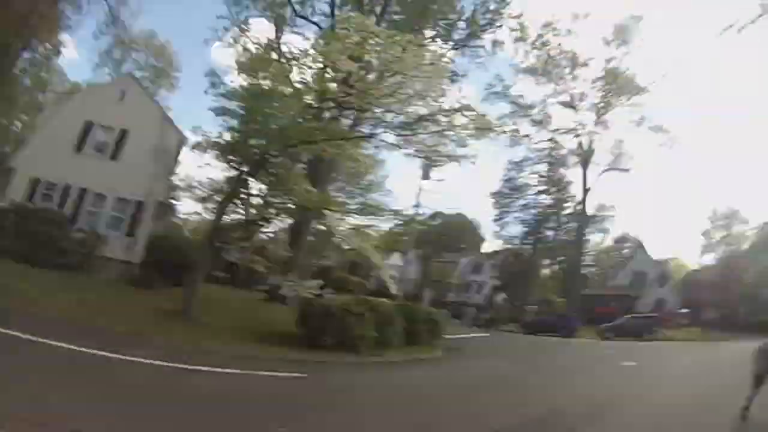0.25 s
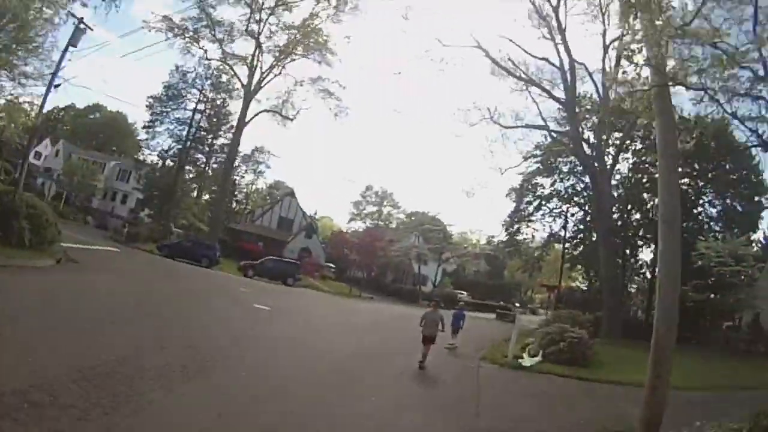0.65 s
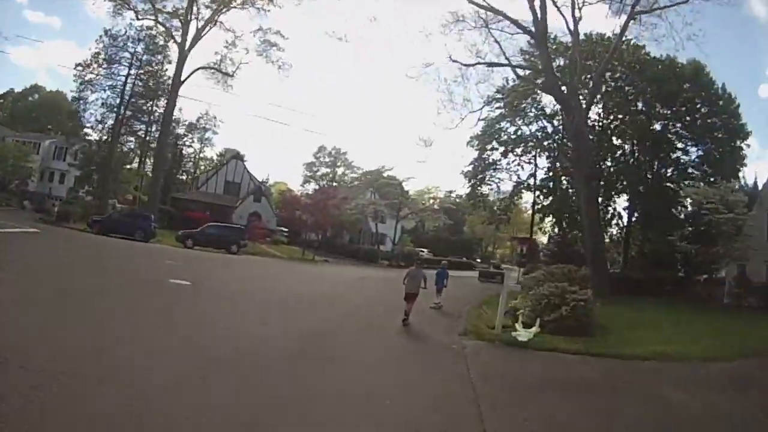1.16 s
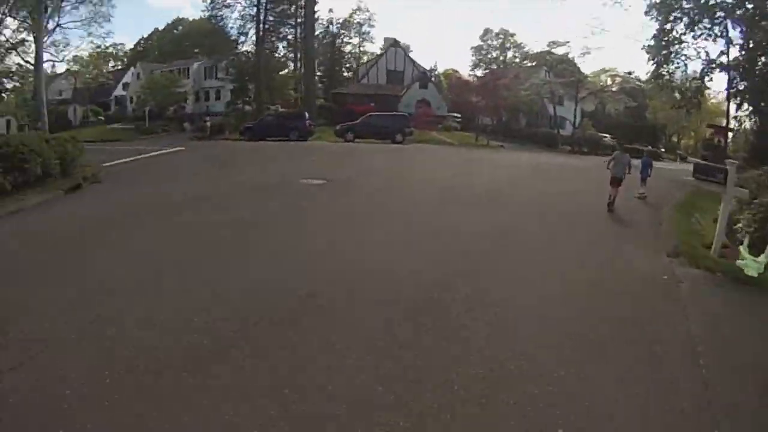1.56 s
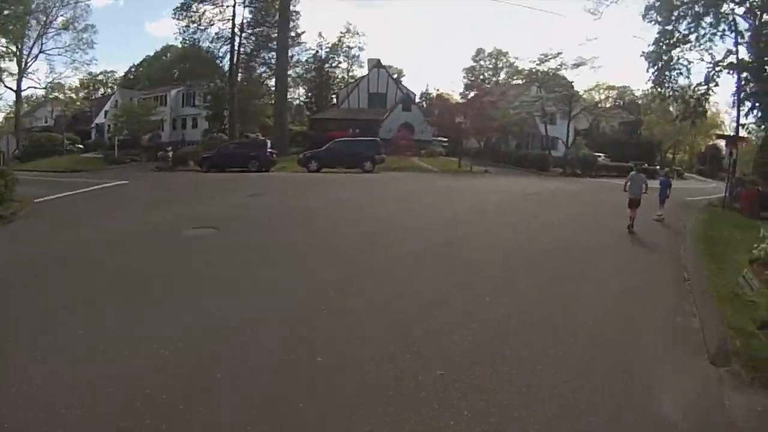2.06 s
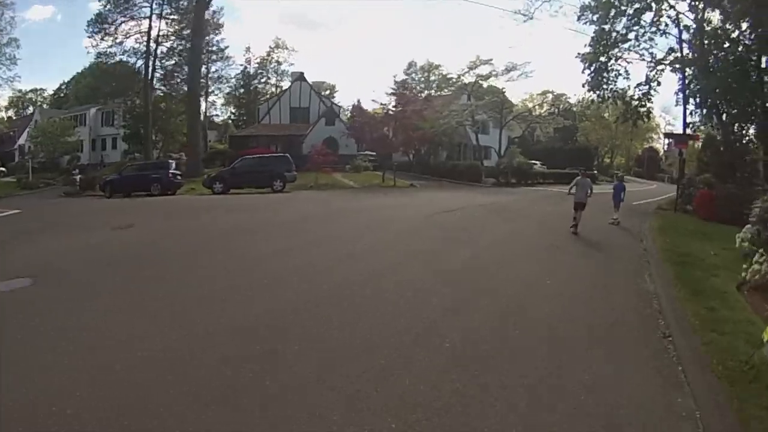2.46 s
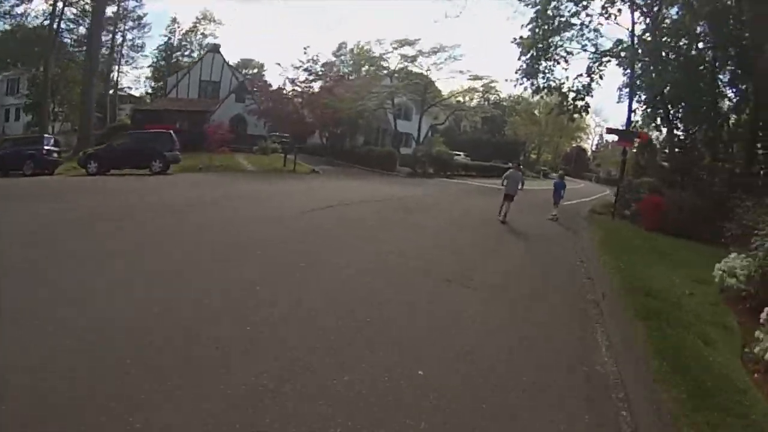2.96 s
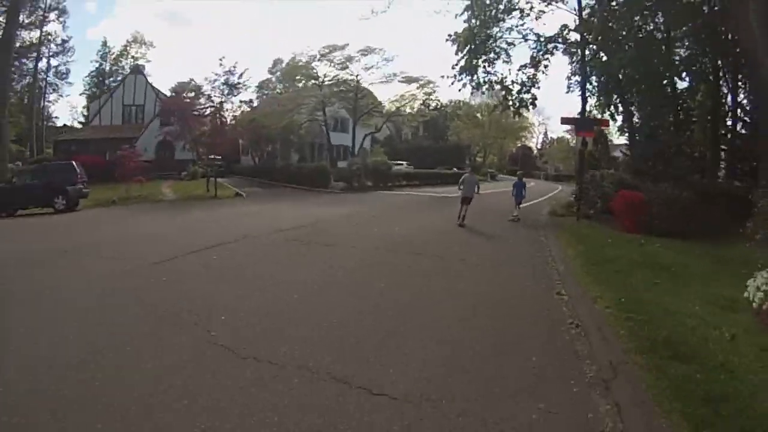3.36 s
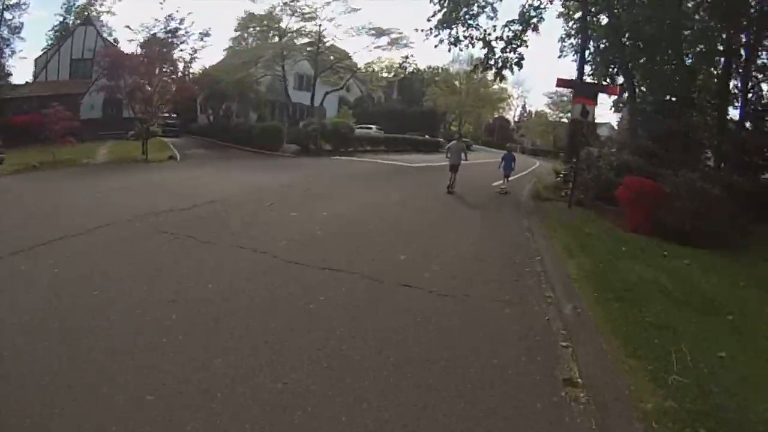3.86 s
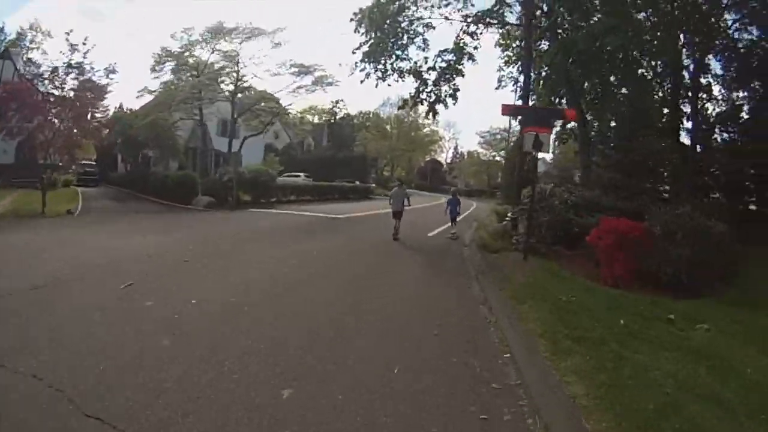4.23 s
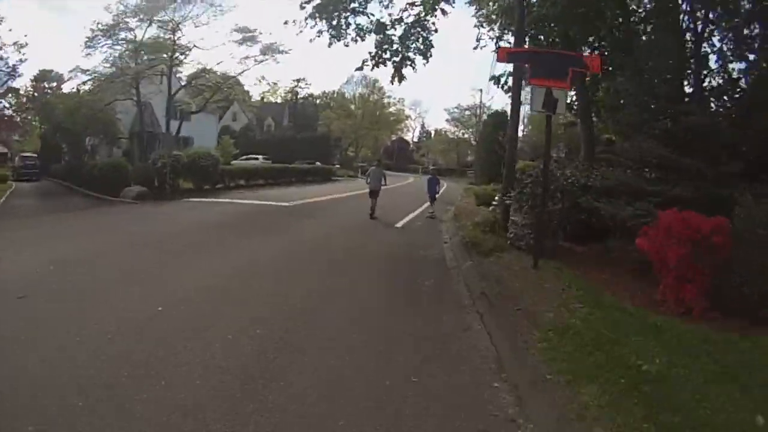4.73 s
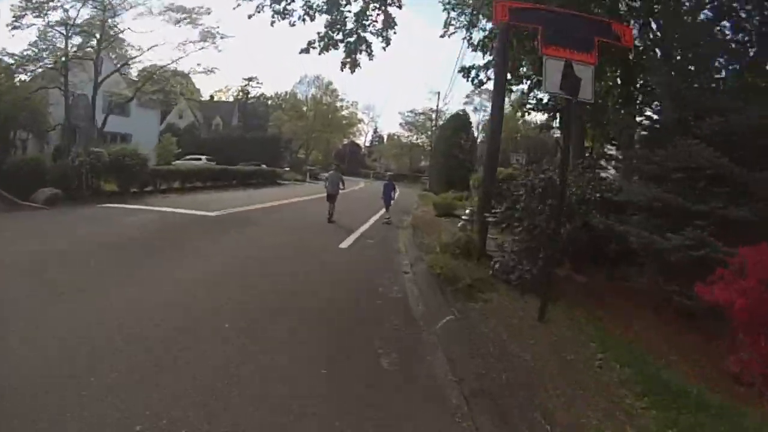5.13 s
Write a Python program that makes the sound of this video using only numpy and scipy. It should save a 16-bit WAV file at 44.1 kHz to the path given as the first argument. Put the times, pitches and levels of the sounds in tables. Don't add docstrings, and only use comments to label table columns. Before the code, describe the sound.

Heard from a sealed camera on a hand-held pole outdoors, a longboard rolls down asphalt with a soft hum and dull hiss. The first second is busy with bass wind thumps, plastic rubbing and clicks, topped by a sharp loud crack near half a second. Then it calms, with scattered snaps, finger slides, a longer drag past three seconds, and a low thump at the end.

```python
import sys
import numpy as np
from scipy import signal
from scipy.fft import rfft, irfft, next_fast_len
from scipy.io import wavfile
from scipy.ndimage import uniform_filter1d, map_coordinates

SR = 44100
rng = np.random.default_rng(int(sys.argv[2]) if len(sys.argv) > 2 else 0)


def attenuation_scalar(level_db):
    decades = np.asarray(level_db, float) / 20
    return 10 ** decades


def generate_wav(signal):
    frames = np.transpose(np.atleast_2d(signal))
    scaled = np.clip(frames, -1, 1) * 32767
    pcm = np.round(scaled).astype(np.int16)
    wavfile.write(sys.argv[1], SR, pcm)


N = 237630

# time in seconds, pitch in Hz, level in dB.
SQUEAK = [(1.52, 476, -86), (1.55, 480, -62), (1.6, 485, -60), (1.68, 491, -67)]
# multiple, level in dB.
SQUEAK_ORDERS = [(3, 1.5), (4, -9), (5, -4.5)]

# time in seconds, tyre hiss in dB.
ASPHALT = [(0.0, -51), (0.27, -53), (0.73, -54.5), (0.88, -55.5), (2.1, -57), (3.29, -55), (3.51, -56.5),
           (5.1, -56.5), (5.39, -55.5)]
# centre in Hz, width in Hz, level in dB.
DECK = [(305, 59, -10), (408.6, 10.8, 2), (502, 32.6, 4), (571, 21.6, 2), (927, 17, -12), (1440, 160, -13)]
# frequency in Hz, level in dB per Hz.
HISS_COLOUR = [(53, -50), (90, -2.5), (236, -11.5), (523, -2.5), (803, -17), (3700, -21.5), (4100, -27.5),
               (15200, -42)]
# centre in Hz, width in Hz, level in dB over the hiss.
WHEEL_CORES = [(953, 110, 2), (1440, 140, 5), (2380, 260, 0), (3580, 240, 4.5)]
HUM_DB, HUM_FOLLOWS = -56.5, -0.14
HISS_DB = 2.5

# time in seconds, level in dB.
AIRSTREAM = [(0, -46), (.8, -54), (3, -57), (3.6, -59), (4.3, -60), (5.39, -57)]
# frequency in Hz, level in dB per Hz.
WIND_COLOUR = [(8, -44), (22, -7.5), (40, 0), (58, -5.5), (120, -37), (300, -30.5), (800, -79)]
# top in seconds, half length in seconds, level in dB.
GUSTS = [(.08, 0.078, -27), (.215, 0.079, -19.5), (.375, 0.075, -34), (.66, .13, -33), (1.09, 0.13, -48),
         (1.25, 0.054, -42), (1.37, 0.068, -40), (1.6, 0.16, -49), (1.73, 0.1, -46), (1.91, 0.096, -44.5),
         (2.15, 0.08, -40.5), (2.32, 0.077, -33.5), (2.41, .08, -40), (2.6, .13, -34.5),
         (3.27, 0.45, -47.5), (3.75, 0.16, -51), (3.99, 0.14, -40), (4.35, 0.19, -50), (4.6, 0.059, -39),
         (4.79, 0.083, -44.5)]
# centre in Hz, width in Hz, level in dB.
POLE = [(76, 8, -11.5), (171, 600, -37)]
# top in seconds, half length in seconds, level in dB.
SWINGS = [(0, 0.033, -22), (.125, 0.04, -48), (.215, 0.065, -29), (.375, 0.024, -22.5), (.44, 0.03, -31),
          (.6, 0.47, -45.5), (.715, 0.022, -45), (1.16, 0.1, -36), (1.37, 0.03, -41), (1.73, 0.042, -58),
          (1.91, .06, -45), (2.27, 0.11, -43), (2.32, 0.046, -32.5), (2.6, 0.16, -37), (3.26, 0.14, -33.5),
          (3.75, 0.056, -41.5), (3.96, 0.05, -37), (4.39, 0.055, -54), (5, 0.33, -51.5), (5.3, 0.32, -48)]
# time in seconds, level in dB, pitch in Hz, 60 dB decay in seconds.
JOLTS = [
    (0.126, -23, 63, 0.22),
    (0.374, -32, 68, 0.086),
    (1.148, -26.5, 71.6, 0.26),
    (1.895, -35, 76, 0.15),
    (2.319, -40, 64.5, 0.11),
    (3.957, -34, 76, 0.11),
    (5.319, -20, 78.3, 0.21),
]
TREMOR_DB, TREMOR_GROWS = -64, 3.6
FADE_DB, ROUND = 23, 1.12

# centre in Hz, width in Hz, level in dB.
HOUSING = [(1680, 190, 2), (2350, 220, 1), (2845, 240, -4), (3320, 240, -1), (4100, 320, -5.5),
           (4530, 250, -8)]
# centre in Hz, width in Hz, level in dB.
CAVITY = [(767, 84, -8), (1005, 99, -0.5), (1440, 180, -1.5)]
# centre in Hz, width in Hz, level in dB.
THIN_WALLS = [(5500, 400, 0), (6300, 450, -2.5), (7450, 300, -3), (8400, 700, -13)]
# centre in Hz, width in Hz, level in dB.
MOUNT = [(185, 240, 2), (356, 117, -5), (717, 212, 2.5)]
# frequency in Hz, level in dB per Hz.
SKIN = [(5000, -40), (8000, 2), (10000, -1.5), (12500, -6), (15300, -12.5)]

# top in seconds, rise in seconds, fall in seconds,
# level in dB, depth (share of the mount) in dB.
TURNS = [(.205, 0.066, 0.063, -44.5, 2), (0.376, 0.025, 0.047, -38, 3), (.44, 0.039, 0.041, -55, 3),
         (.615, 0.064, 0.066, -42.5, -1), (0.706, .08, 0.053, -39, -1.5), (1.725, 0.032, 0.072, -48.5, 1.5),
         (1.85, 0.05, 0.054, -56, -1)]
# top, rise and fall in seconds, level in dB, depth in dB.
SCUFFS = [
    (.01, 0.044, 0.096, -50.5, 1),
    (0.08, 0.024, 0.023, -39.5, -6),
    (0.254, 0.037, 0.069, -38, -3.5),
    (5.385, 0.034, .04, -51.5, -4),
]
# top, rise and fall in seconds, level in dB, depth in dB.
SLIDES = [(.9, 0.18, 0.2, -57.5, -11), (1.235, 0.028, 0.052, -54, -6), (2.576, 0.065, 0.068, -34.5, -14.5),
          (2.642, 0.013, 0.045, -45, -7), (2.89, 0.17, .08, -54.5, -8), (2.95, 0.056, 0.034, -56.5, -10),
          (3.975, 0.029, 0.077, -42.5, -10), (5.2, .08, 0.17, -62, -15)]
# top, rise and fall in seconds, level in dB, depth in dB.
DRAG = [
    (3.17, 0.032, 0.061, -54, -4.5),
    (3.257, 0.055, 0.12, -33, -21.5),
    (3.39, 0.068, 0.075, -51, -30),
]
# top in seconds, fall in seconds, level in dB, depth in dB.
SETTLES = [(0.13, 0.01, -44, 15), (.418, 0.016, -58, -4), (0.479, 0.049, -39, -6), (1.136, 0.014, -46.5, 3),
           (1.149, 0.078, -41, 2), (1.356, 0.038, -52.5, 10), (1.385, 0.07, -49.5, 4),
           (1.597, 0.064, -56.5, 1), (1.906, .015, -53, -23), (2.322, 0.062, -51.5, 3.5),
           (4.585, 0.042, -46.5, 0.5), (4.607, .02, -52, -7), (4.77, 0.013, -40, -26),
           (4.793, 0.042, -51, -6.5), (.328, 0.026, -48.5, 2), (2.554, 0.029, -44, -1),
           (5.322, 0.057, -43, 0.5), (3.219, 0.019, -50, 3), (3.425, .03, -48, -12)]
# air inside in dB, thin walls in dB, skin in dB,
# squareness of the rise, squareness of the fall.
GRIPS = [
    (-3.5, -16.5, -26, 2.25, 2.1),
    (-5.5, -10.5, -16, 2.5, 1.75),
    (-5, -14, -23, 2.18, 1.83),
    (2, -15.5, -18.5, 2.6, 2.1),
    (-7.5, -15.5, -20, 1.37, 0.85),
]
STROKE_DB, SETTLE_RISE_S = 26.5, 0.013
HOLLOW_SHARE = 0.36

# time in seconds, peak in dB, pitch in Hz, bright crack in dB.
CRACKS = [
    (.462, 3, 2794, -24.5),
    (2.306, -11, 2310, -19),
]
# time in seconds, peak in dB, pitch in Hz, bright crack in dB.
SNAPS = [(.038, -21, 2670, -15), (1.142, -16, 1580, -19.5), (1.376, -21.5, 1480, -33),
         (2.638, -32, 1680, -5), (3.41, -32, 3560, -17), (3.415, -34.5, 3210, -8), (3.75, -31, 2200, -20),
         (3.953, -24, 1640, -16), (4.769, -22.5, 2260, -14), (4.788, -36.5, 3470, -21),
         (5.316, -26, 1700, -27)]
# time in seconds, peak in dB, pitch in Hz, bright crack in dB.
RATTLES = [(.043, -28, 1540, -14), (0.236, -23.5, 1435, -5), (0.362, -32.5, 1460, -29),
           (.409, -26, 1920, -10), (.453, -30.5, 1540, -2), (1.589, -42.5, 2410, -6),
           (1.903, -51, 2620, -5), (2.69, -46.5, 2950, -4), (4.579, -49.5, 3660, 8),
           (4.605, -34, 1440, -33)]
# time in seconds, peak in dB, pitch in Hz, bright crack in dB.
BUMPS = [(.121, -23.5, 1320, -3), (0.14, -40, 1410, -17), (.159, -33.5, 1710, -14), (0.325, -39, 1660, -20),
         (1.354, -33.5, 2300, -32), (1.715, -33.5, 1500, -16), (1.837, -37.5, 1600, -21),
         (2.306, -20, 996, -25), (1.143, -25, 970, -27), (4.291, -45, 1440, -17)]
# rattle in dB, low thud in dB.
CLICK_KINDS = [
    (-11.5, -27.5),
    (-6, -25),
    (5, -23),
    (-5, -3.5),
]


def unit(x):
    return x / np.sqrt(np.mean(x ** 2) + 1e-20)


def curves(rows):
    s, *cols = np.transpose(rows)
    return [np.interp(np.arange(N) / SR, s, c) for c in cols]


def wobble(rate):
    points = rng.standard_normal(int(N * rate / SR) + 4)
    return map_coordinates(points, [np.arange(N) * rate / SR])


def filtered(x, response):
    m = next_fast_len(len(x) + 4096)
    return irfft(rfft(x, m) * response(np.fft.rfftfreq(m, 1 / SR)), m)[:len(x)]


def colour(points):
    f, v = np.transpose(points)
    return lambda hz: attenuation_scalar(np.interp(np.log(hz + 1), np.log(f + 1), v))


def modes(rows):
    def response(f):
        total = 0
        for k, (centre, width, db) in enumerate(rows):
            total = total + (-1) ** k * attenuation_scalar(db) * 1j * f * width / (centre * centre - f * f + 1j * f * width)
        return total
    return response


def grit(rate, spread_db, noise):
    hit = rng.random(N) < rate / SR
    size = np.minimum(rng.exponential(size=N), 5.5)
    sign = np.sign(rng.standard_normal(N))
    impacts = unit(hit * attenuation_scalar(spread_db * size) * sign)
    return unit(impacts + noise * rng.standard_normal(N))


def even(x, seconds):
    power = abs(uniform_filter1d(unit(x) ** 2, size=int(seconds * SR)))
    return unit(x / np.sqrt(power + 0.84))


def swell(s, rise, fall, db, loss_db, sudden, lasting):
    t = np.arange(N) / SR - s
    flank = abs(t / np.where(t < 0, rise, fall)) ** np.where(t < 0, sudden, lasting)
    return attenuation_scalar(db - np.minimum(loss_db * flank, 120))


def swells(rows):
    return sum(swell(s, half, half, db, FADE_DB, ROUND, ROUND) for s, half, db in rows)


def bearing():
    hz, db = curves(SQUEAK)
    angle = 2 * np.pi * np.cumsum(hz * (1 + 0.0046 * wobble(58.3))) / SR
    squeak = attenuation_scalar(db) * sum(attenuation_scalar(level + 3 * wobble(24)) * np.sin(k * angle) for k, level in SQUEAK_ORDERS)
    half_s = SQUEAK[-1][0] - SQUEAK[1][0]
    sounding = abs(np.arange(N) / SR - SQUEAK[2][0]) < half_s
    phase = np.cumsum(11 * (1 + 0.15 * wobble(2.5))) / SR % 1
    tick_noise = unit(filtered(rng.standard_normal(N), modes([(9300, 810, 0)])))
    ticks = attenuation_scalar(-79.5 - 60 * phase / 0.56) * tick_noise
    return squeak * sounding + 3 * ticks


def wheels():
    road_db, = curves(ASPHALT)
    hum_db = HUM_DB + HUM_FOLLOWS * (road_db - road_db.mean())
    hiss_db = road_db + HISS_DB

    def deck(f):
        return modes(DECK)(f) * f ** 2 / (f ** 2 + 200 ** 2)

    def tyres(f):
        return colour(HISS_COLOUR)(f) * np.sqrt(1 + abs(modes(WHEEL_CORES)(f)) ** 2)

    hum = unit(filtered(grit(900, 5.5, 1.9), deck))
    hiss = unit(filtered(grit(2500, 2.86, 1.24), tyres))
    hum = attenuation_scalar(hum_db + 0.78 * wobble(5.2)) * hum
    return hum + attenuation_scalar(hiss_db + 0.4 * wobble(9) + 0.8 * wobble(40)) * hiss


def wind():
    wind_db, = curves(AIRSTREAM)
    thuds = even(filtered(rng.standard_normal(N), colour(WIND_COLOUR)), 0.072)
    return (attenuation_scalar(wind_db) + swells(GUSTS)) * thuds


def pole_sway():
    wind_db, = curves(AIRSTREAM)
    sway = attenuation_scalar(TREMOR_DB + TREMOR_GROWS * (wind_db - wind_db.mean())) + swells(SWINGS)
    shaken = filtered(grit(120, 4.3, 0.52), lambda f: modes(POLE)(f) * modes([(78, 60, 0)])(f))
    return attenuation_scalar(-5.0) * sway * even(shaken, 0.057)


def pole_jolts():
    out, t = np.zeros(N + SR), np.arange(SR // 3) / SR
    for s, db, hz, t60 in JOLTS:
        out[round(s * SR):][:len(t)] += attenuation_scalar(db - 60 * t / t60) * np.sin(2 * np.pi * hz * t)
    return out[:N]


def grip():
    settles = [(s, SETTLE_RISE_S, fall, db, depth_db) for s, fall, db, depth_db in SETTLES]
    total = 0
    for rows, character in zip([TURNS, SCUFFS, SLIDES, DRAG, settles], GRIPS):
        hollow_db, walls_db, skin_db, sudden, lasting = character
        for s, rise, fall, db, depth_db in rows:
            shares = attenuation_scalar([0, hollow_db + HOLLOW_SHARE * depth_db, walls_db, depth_db, skin_db])
            total = total + np.outer(shares, swell(s, rise, fall, db, STROKE_DB, sudden, lasting))
    return total


def rubbing():
    bodies = [
        lambda f: modes(HOUSING)(f) * f ** 4 / (f ** 4 + 1300 ** 4) / (1 + (f / 5200) ** 6),
        lambda f: modes(CAVITY)(f) * f ** 2 / (f ** 2 + 700 ** 2) / (1 + (f / 2100) ** 4),
        lambda f: modes(THIN_WALLS)(f) * f ** 4 / (f ** 4 + 2800.0 ** 4) / (1 + (f / 10000) ** 4),
        lambda f: modes(MOUNT)(f) / (1 + (f / 1000) ** 4),
        colour(SKIN)]
    gains = grip() * attenuation_scalar(1.85 * wobble(120))
    return sum(gain * unit(filtered(grit(4000, 2.7, 1.07), body)) for gain, body in zip(gains, bodies))


def click(hz, crack_db, rattle_db, thud_db):
    t = np.arange(SR // 16) / SR
    burst = rng.standard_normal((2, len(t)))

    def peak(x):
        return x / abs(x).max()

    def rattling(f):
        parts = modes(MOUNT[1:] + CAVITY + HOUSING + [(hz, 110, 5)])(f)
        return parts * 1j * f / (0.31 * hz + 1j * f) / (1 + 1j * f / (2.4 * hz))

    def cracking(f):
        return (modes(THIN_WALLS)(f) + 0.16) / (1 + 1j * f / 7000)

    snap = np.cos(2 * np.pi * (hz * t - 2.4)) * np.exp(-((hz * t - 2.2) / 1.3) ** 2)
    rattle = filtered(burst[0] * attenuation_scalar(-60 * t / 0.015), rattling)
    ring = np.sin(2 * np.pi * hz * t) * attenuation_scalar(-60 * t / 0.025) * (1 - np.exp(-t / 0.0016))
    crack = filtered(burst[1] * attenuation_scalar(-60 * t / 0.005), cracking)
    thud = -np.sin(2 * np.pi * 150 * t) * attenuation_scalar(-60 * t / 0.011)
    housing = attenuation_scalar(rattle_db) * (peak(rattle) + 0.73 * ring)
    return 0.51 * snap + housing + attenuation_scalar(crack_db) * peak(crack) + 3.4 * attenuation_scalar(thud_db) * thud


def clicks():
    out = np.zeros(N + SR)
    for rows, (rattle_db, thud_db) in zip([CRACKS, SNAPS, RATTLES, BUMPS], CLICK_KINDS):
        for s, db, hz, crack_db in rows:
            sound = click(hz, crack_db, rattle_db, thud_db)
            out[round((s + .0004) * SR):][:len(sound)] += attenuation_scalar(db) * sound
    return out[:N]


def scene():
    ride = bearing() + wheels()
    shaking = wind() + pole_sway() + pole_jolts()
    return (ride + shaking + rubbing() + clicks())[None]


def top_cut(x):
    return signal.sosfilt(signal.butter(12, 16530, fs=SR, output="sos"), x)


def record(dry):
    mix = filtered(dry[0], lambda hz: np.where(hz < 15330, 1, attenuation_scalar(-32)))[None]
    return top_cut(mix)


dry = scene()
out = record(dry)
generate_wav(out)
```